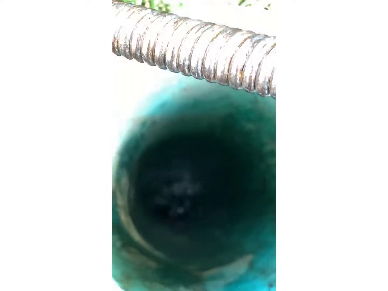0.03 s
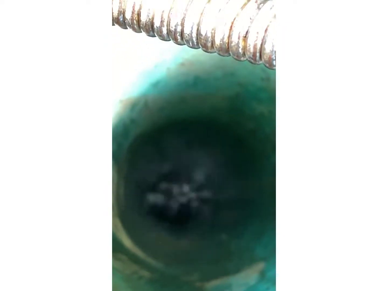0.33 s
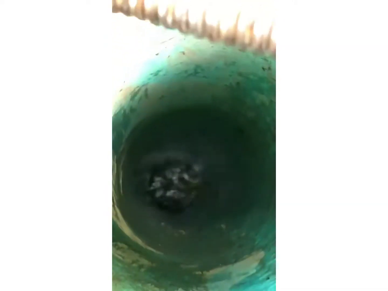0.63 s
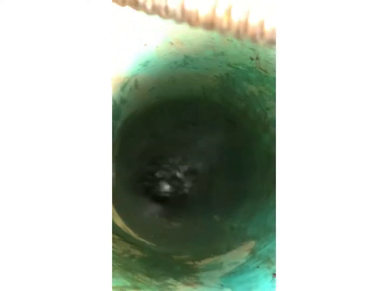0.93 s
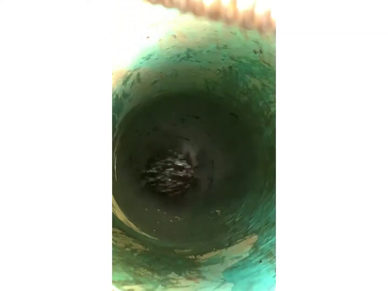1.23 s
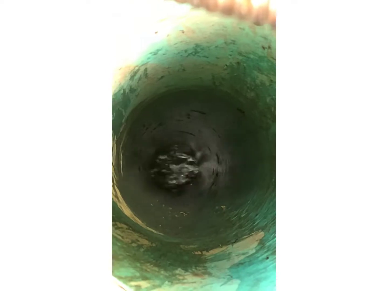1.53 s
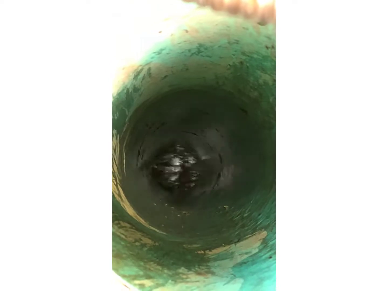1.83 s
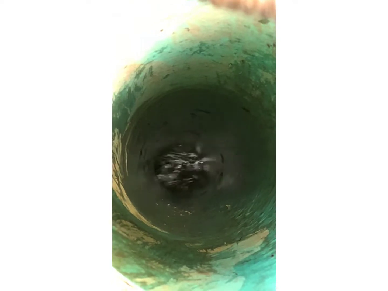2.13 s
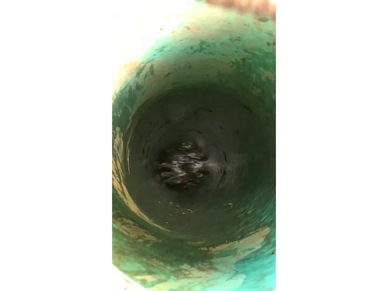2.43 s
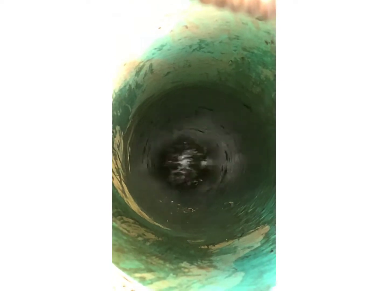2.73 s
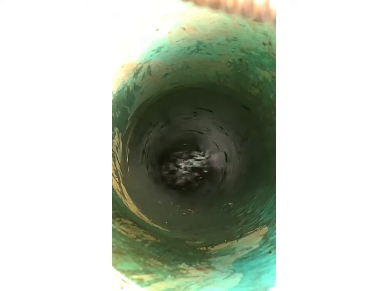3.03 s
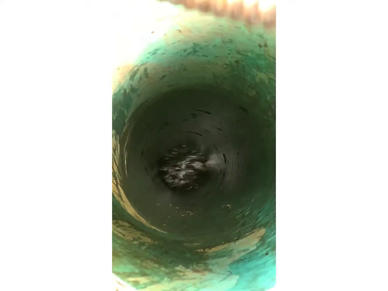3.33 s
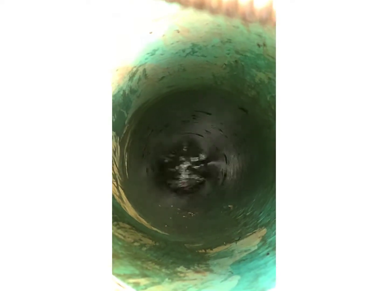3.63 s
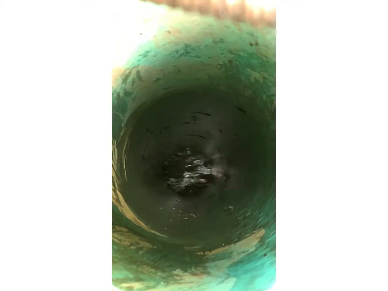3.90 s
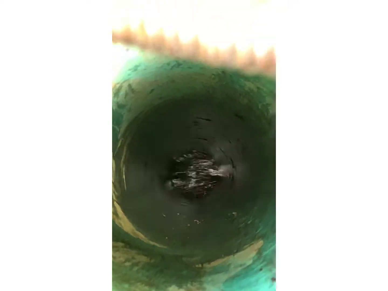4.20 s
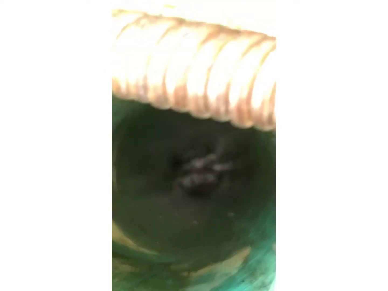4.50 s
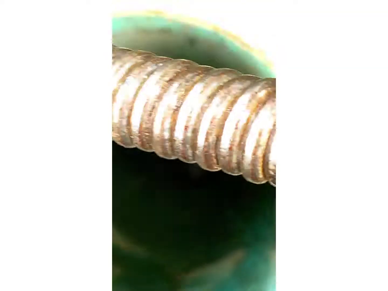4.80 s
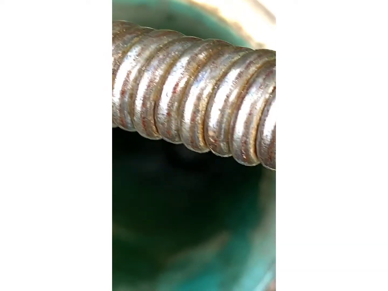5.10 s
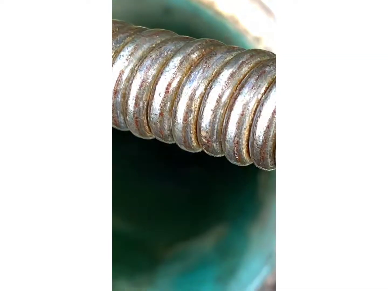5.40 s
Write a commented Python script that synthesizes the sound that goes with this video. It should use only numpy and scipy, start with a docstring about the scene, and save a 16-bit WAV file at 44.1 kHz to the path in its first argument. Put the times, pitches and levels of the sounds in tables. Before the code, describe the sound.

Heard from just above an open plastic sewer pipe, water gurgles and sprays down below with a low rumble and a hollow ring. At the start a metal cable chatters rapidly against the wall with clacks and thumps, then settles into scattered single knocks. Toward the end, bubbles plop more thickly and the uneven whirr of the cable machine outside fades up.

```python
"""Drain cable in a sewer pipe

Down an upright plastic pipe, a steel cable rattles against the wall for a second and a half, then
only bumps now and then; the air column rings with it. Water churns, gurgles and sprays at the
bottom throughout. Near the end it bubbles harder and the cable machine's whirr comes through."""
import sys
import numpy as np
from scipy import signal
from scipy.fft import rfft, irfft
from scipy.io import wavfile
from scipy.ndimage import map_coordinates

SR = 44100
rng = np.random.default_rng(int(sys.argv[2]) if len(sys.argv) > 2 else 0)


def waveform_to_disk(signal):
    """Save audio, clipped to [-1, 1], as 16-bit WAV at the path in sys.argv[1]."""
    frames = np.transpose(np.atleast_2d(signal))
    scaled = np.clip(frames, -1, 1) * 32767
    samples = np.round(scaled).astype(np.int16)
    wavfile.write(sys.argv[1], SR, samples)


N = 244755
TIME = np.arange(N) / SR
TAPS = 16384  # samples in a one-shot


# the rattle's ride: t/s, boom level/dB, boom f/Hz, clatter level/dB
RATTLE_RIDE = [(0.14, -44, 190, -35.5), (0.28, -25.5, 196, -33.5), (0.41, -30, 154, -39.5),
               (0.5, -34, 163, -34.5), (0.56, -30, 193, -38), (0.68, -26, 191, -34.5),
               (0.73, -29, 182, -57), (0.82, -26.5, 181, -47), (0.92, -34, 152, -35), (1.0, -32, 147, -39),
               (1.14, -29, 144, -50), (1.3, -25, 143, -59), (1.39, -27.5, 202, -55), (1.48, -28, 182, -49),
               (1.56, -34.5, 139, -50)]
# dark EQ of the boom: f/Hz, level/dB
BOOM_EQ = [(50, -34), (100, -1.5), (180, 5), (260, -6.5), (340, 2), (550, -37.5), (900, -64), (4000, -100)]
# hard, peaky EQ of the clatter: f/Hz, level/dB
CLATTER_EQ = [(150, 9), (330, 17), (550, -19), (850, 20), (1200, -4), (1700, -33), (2200, -10), (3000, -34),
              (5000, -6), (12000, -81)]
def rattle(pipe):
    """The cable's coils chatter on the wall: contacts boom and scrape, hard ones ring hollow."""
    boom_gain, _, clatter_gain = levels(RATTLE_RIDE)
    contacts, pushes = coil_knocks()
    grit = evened(impacts(per_s=150, spread_db=3.5))
    scrape = contacts + amp(-5) * grit + amp(-18) * rng.standard_normal(N)
    hard = sum(through(impacts(per_s=14, spread_db=1.5), hollow_ring(bright_db=-1, scatter_db=3))
               for spot in range(4))
    boom = amp(-6.5) * evened(through(pushes, pipe))
    boom += amp(-12) * evened(through(scrape, colour(BOOM_EQ), pipe))
    clatter = amp(-7) * evened(through(scrape, colour(CLATTER_EQ), pipe)) + amp(-9) * evened(hard)
    return (boom * boom_gain + clatter * clatter_gain) * rattle_envelope()


def coil_knocks(per_s=46, uneven=0.15, spread_db=2.2):
    """Coils hit the wall one after another: sharp contacts, and soft pushes at the boom's pitch."""
    contacts, pushes = np.zeros(N), np.zeros(N)
    times, _, boom_hz, _ = np.transpose(RATTLE_RIDE)
    coils_passed = np.cumsum(per_s * (1 + uneven * drift(per_s=40))) / SR
    strength = amp(spread_db * drift(per_s=50))
    for at in np.flatnonzero(np.diff(np.floor(coils_passed)) > 0):
        contacts[at] = strength[at]
        hz = np.interp(at / SR, times, boom_hz)
        add(pushes, at / SR, strength[at] * air_push(hz, decay_s=0.0052))
    return evened(contacts), evened(pushes)


def rattle_envelope(start_s=0.129, end_s=1.59, attack_s=0.006, release_db_per_s=100):
    """The rattle snaps in, holds, then dies away."""
    attack = np.clip((TIME - start_s) / attack_s, 0, 1)
    return attack * amp(-release_db_per_s * np.maximum(TIME - end_s, 0))


# single cable hits: t/s, clack level/dB, clack tilt/(dB per octave), thump level/dB, thump f/Hz
CABLE_HITS = [(0.139, -26, -4, -28.5, 202), (0.188, -21.5, -4, -41, 198), (0.243, -22, -7, -22.5, 226),
              (0.278, -33, 2, -23, 193), (0.296, -26.5, 4.5, -31, 208), (0.361, -27, -8, -20.5, 161),
              (0.411, -42, -11, -42, 192), (0.436, -34, -6, -40, 148), (0.479, -30, -4, -37, 190),
              (0.541, -28.5, 5.5, -41, 174), (0.569, -52, -2, -27.5, 200), (0.587, -43, -7, -33, 186),
              (0.616, -48, 0, -15.5, 166), (0.73, -29.5, -4.5, -28, 167), (0.792, -26, -6.5, -41, 191),
              (0.884, -30.5, -14, -44, 183), (0.901, -31.5, 2, -21.5, 150), (0.968, -33, 6, -37, 153),
              (1, -31, -4, -36, 157), (1.216, -31, -4, -42, 147), (1.261, -31.5, 3.5, -27, 147),
              (1.315, -38, -9.5, -23, 136), (1.343, -23.5, -1, -16, 184.6), (1.429, -26.5, -9, -24, 186.4),
              (1.51, -37, -8, -35, 169), (1.528, -29.5, 2.5, -29, 145), (1.596, -51, -16, -26.5, 117),
              (1.695, -41, -15, -29, 124), (1.961, -56, 3, -30, 121), (2.452, -34, -10, -33, 145),
              (2.683, -23.5, 0, -29, 172), (2.78, -25.5, -1.5, -36, 153), (2.918, -35.5, -6, -32, 126),
              (3.015, -27.5, -3.5, -30.5, 86), (3.134, -35.5, -18, -35, 94), (3.422, -34.5, -3, -30, 141),
              (3.946, -39.5, -16, -42, 110), (4.173, -34, -4, -38, 172), (4.428, -29, 2, -32, 111),
              (4.565, -45, -21, -28, 126), (4.716, -33, 9, -42, 107), (4.861, -31, -7.5, -24, 132),
              (5.129, -27, -4.5, -28, 130), (5.421, -42, -9, -21.5, 139)]
# EQ of steel scuffing plastic: f/Hz, level/dB
SCUFF_EQ = [(150, -13), (350, 8), (550, 4), (850, 2.5), (1150, -6.5), (1700, -3.5), (2200, -16.5),
            (3000, -6), (4500, -34), (12000, -47)]
def cable_hits(pipe):
    """The cable strikes: a hollow clack with a scuff of steel, and a soft thump down the pipe."""
    out, steel = np.zeros(N), colour(SCUFF_EQ)
    for s, clack_db, bright_db, thump_db, thump_hz in CABLE_HITS:
        scuff = through(noise_burst(decay_s=0.02), steel, pipe)
        ring = hollow_ring(bright_db, scatter_db=2.5)
        thump = through(air_push(thump_hz, decay_s=0.0073), pipe)
        add(out, s, amp(clack_db) * peaked(evened(ring) + amp(-7) * evened(scuff)))
        add(out, s, amp(thump_db - 1) * peaked(thump))
    return out


def air_push(hz, decay_s):
    """A soft, dying swing of air that takes a moment to build."""
    t = np.arange(TAPS // 4) / SR
    return np.sin(2 * np.pi * hz * t) * np.exp(-t / decay_s) * (1 - np.exp(-t * hz))


# hollow resonances of the pipe near its mouth: f/Hz, level/dB, t60/s
MOUTH_MODES = [(365, -14.5, 0.059), (393.7, -8, 0.15), (444.2, -9.5, 0.38), (481.8, -7, 0.43),
               (692, 1.5, 0.098), (827, 4, 0.1), (1035, 6.5, 0.091), (1283, 8.5, 0.07), (1488, -1.5, 0.12),
               (1705, 4, 0.083), (1890, -20, 0.036), (2092, -7, 0.15), (2385, -8, 0.13), (2534, -8, 0.054),
               (2847, -8, 0.069)]
def hollow_ring(bright_db, scatter_db):
    """The pipe rings hollow near its mouth, tilted by bright_db an octave, a new balance each time."""
    hz, db, t60 = np.transpose(MOUTH_MODES)[:, :, None]
    t = np.arange(TAPS) / SR
    db = db + bright_db * np.log2(hz / hz.mean()) + scatter_db * rng.standard_normal(hz.shape)
    modes = amp(db - 60 * t / t60) * np.sin(2 * np.pi * hz * t)
    return modes.T @ rng.choice([-1, 1], len(hz))


# modes of the air column: f/Hz, least width/Hz, level/dB
AIR_MODES = [(108.8, 11, -1), (135.4, 38, -6.5), (155.1, 5.56, 8), (201.9, 5.6, 7.5), (239.4, 17, -1),
             (287, 6.4, 3), (329, 8.5, 1), (385.8, 13, 6), (441.3, 9, 7.5), (490, 11.5, 9), (530, 11, -1),
             (568, 13, 1), (631, 9, 6.5), (691.4, 21.5, 6.5), (777.6, 21, 7), (826, 19, 4),
             (864.4, 22.6, 2.5), (954, 35, 1), (1020, 46, 7), (1189, 24.6, 19), (1310, 28, 4),
             (1362, 34.5, 10.5), (1440, 33, 1.5), (1522, 15, 7.5), (1590, 27, -7.5), (1670, 16.7, 11),
             (1834, 36, 5), (1985, 41, 0), (2000, 16.7, -6)]
def air_column(direct_db=-9):
    """The pipe's impulse response: the direct path plus the ring of its air."""
    hz, width, db = np.transpose(AIR_MODES)[:, :, None]
    # the open mouth lets high notes escape, so none of them rings for long
    width = np.maximum(width, hz / 34)
    detune = np.fft.rfftfreq(TAPS, 1 / SR) - hz
    modes = (amp(db) / (1 + 2j * detune / width)).sum(axis=0)
    return irfft(amp(direct_db) + modes)[:TAPS * 3 // 4]


# bubbles bursting out of the churn: t/s, level/dB, f/Hz, decay/cycles
PLOP_CUES = [(0.094, -40, 1630, 6), (0.105, -28.5, 1640, 3.8), (0.215, -37, 1570, 6.2),
             (0.2274, -28, 1610, 11), (0.277, -25, 880, 5.7), (0.295, -33, 1620, 9.8),
             (0.36, -31, 1627, 11), (0.4115, -35, 1610, 8.3), (0.54, -31, 1710, 1.4),
             (0.628, -30, 1646, 5.1), (0.922, -39, 1640, 15), (1.093, -42, 1730, 6.2),
             (1.179, -47, 1630, 6.9), (1.226, -47, 1680, 7), (1.429, -41, 1550, 21), (1.551, -41, 1630, 8),
             (1.734, -42.5, 1720, 12), (1.3436, -44, 1670, 1.9), (1.984, -32.5, 1378, 3.2),
             (2.207, -43, 1470, 93), (2.454, -29.5, 1628, 23), (2.7513, -34.5, 1554, 11),
             (3.016, -23.5, 1334, 4.8), (3.013, -29, 1600, 9.1), (3.015, -40, 449.4, 74),
             (2.906, -37, 1294, 35), (3.1772, -33.5, 1227, 19), (3.202, -41, 880, 11),
             (3.5803, -38, 1674, 8.7), (3.993, -42.5, 1590, 12), (4.2105, -30, 880, 4.5),
             (4.35, -43, 1724, 22), (4.429, -29, 1040, 7.5), (4.627, -27, 1004, 13),
             (4.712, -31.5, 858, 14), (4.776, -36, 1005, 18), (4.863, -19, 1038, 13),
             (4.863, -30, 1310, 14), (4.861, -36, 398, 19), (4.905, -30.5, 830, 8.2), (4.906, -42, 373, 15),
             (4.999, -32.5, 1337, 13), (5.11, -58, 2380, 18), (5.209, -39, 1706, 12),
             (5.21, -32.5, 810, 37), (5.262, -46, 2310, 32), (5.3, -31, 910, 28), (5.434, -31.5, 1010, 13)]
# wet EQ of the water: f/Hz, level/dB
WATER_EQ = [(100, 8), (160, 5.5), (280, 6), (440, -5), (700, -2.5), (1000, -9.5), (1600, -8), (2000, -19),
            (2500, -12), (3200, -13), (5000, -22.5), (12000, -61)]
def plops(pipe):
    """Single bubbles: the film bursts with a brief splash, and the bubble rings in the pipe."""
    out, wet = np.zeros(N), colour(WATER_EQ)
    for s, db, hz, cycles in PLOP_CUES:
        plop = amp(-11) * peaked(through(noise_burst(decay_s=0.0015, samples=TAPS // 2), wet))
        add(plop, 0, bubble(hz, cycles, rise=0.00074))
        add(out, s, amp(db - 1) * peaked(through(plop, pipe)))
    return out


# throaty gulps: t/s, level/dB, f/Hz
GULP_CUES = [(0.142, -24, 333), (0.275, -28.5, 297), (0.812, -31, 367), (1.431, -36, 490),
             (1.528, -28.5, 317), (2.685, -37.5, 436), (2.738, -35, 510), (3.015, -26.5, 447),
             (5.131, -41.5, 476)]
def gulps(pipe):
    """A pocket of air collapses: a rough burst around one pitch that sets the pipe ringing."""
    out = np.zeros(N)
    for s, db, hz in GULP_CUES:
        throat = colour([(hz / 4, -40), (hz / 1.4, -15), (hz, 0), (hz * 1.4, -15), (hz * 5, -45)])
        add(out, s, amp(db) * peaked(through(noise_burst(decay_s=0.024), throat, pipe)))
    return out


# the deep rumble's ride: t/s, level/dB
RUMBLE_RIDE = [(0.0, -46.5), (0.4, -67), (0.75, -39), (1.3, -42.5), (1.6, -52), (1.95, -39.5), (2.2, -46),
               (2.45, -43.5), (2.63, -46), (2.85, -47), (3.0, -46.5), (3.3, -47.5), (3.85, -45.5),
               (4.07, -51), (4.4, -47.5), (5.55, -45)]
# its bass-heavy EQ: f/Hz, level/dB
RUMBLE_EQ = [(15, -6.5), (35, -10), (60, -3), (100, -8.5), (160, -14.5), (250, -19.5), (500, -49),
             (3000, -101)]
def water(pipe):
    """Water churns at the bottom of the pipe: a lumpy rumble, and bubbles over a surging splatter."""
    lumps = rng.standard_normal(N) * amp(5 * np.tanh(drift(per_s=11)))
    rumble = amp(2) * levels(RUMBLE_RIDE)[0] * evened(through(lumps, colour(RUMBLE_EQ), pipe))
    splatter = evened(impacts(per_s=400, spread_db=2)) + amp(-3) * rng.standard_normal(N)
    churn = bubble_swarm(300, 4500, cycles=7, per_s=800, spread_db=2.8)
    churn += splatter * amp(2.7 * drift(per_s=14))
    gurgle = evened(through(churn, colour(WATER_EQ), pipe))
    return rumble + gurgle * churn_gain(level_db=-48.5, follows=0.25, stirred_db=4.5)


# how hard the water churns: t/s, level/dB
CHURN_RIDE = [(0.0, -58), (0.08, -64.5), (0.15, -50.5), (0.45, -57.5), (0.82, -53), (1.2, -56),
              (1.27, -49.5), (1.65, -59), (2.02, -51.5), (2.17, -68.5), (2.25, -48), (2.62, -58.5),
              (2.7, -53.5), (3.08, -52.5), (4.42, -51), (4.58, -53), (4.8, -46), (5.55, -48)]
def churn_gain(level_db, follows, stirred_db, usual_db=-50, lag_s=0.06):
    """A water layer's fader: it follows the churn and lifts while the rattling cable stirs it."""
    churn_db = np.interp(TIME, *np.transpose(CHURN_RIDE)) - usual_db
    pole = np.exp(-1 / (lag_s * SR))
    stirred = signal.lfilter([1 - pole], [1, -pole], rattle_envelope())
    return amp(level_db + follows * churn_db + stirred_db * stirred)


# the bubbling swells towards the end: t/s, level/dB
BUBBLING_RIDE = [(0, -75), (4.1, -55.5), (4.45, -64), (4.85, -51), (5.3, -71), (5.55, -64)]
def bubbling(pipe):
    """A thick run of mid-sized bubbles that ring up the pipe."""
    swarm = bubble_swarm(680, 1500, cycles=14, per_s=150, spread_db=2.4)
    return levels(BUBBLING_RIDE)[0] * evened(amp(3) * swarm + evened(through(swarm, pipe)))


def bubble_swarm(low_hz, high_hz, cycles, per_s, spread_db, sizes=90):
    """Bubbles of all sizes at random times, with even power per Hz."""
    out = np.zeros(N)
    draws = rng.random((sizes * 100, 3))[:int(per_s * N / SR)]
    shapes = [bubble(hz, cycles, rise=0.0026) * hz for hz in np.geomspace(low_hz, high_hz, sizes)]
    for when, kind, rarity in draws:
        strength = amp(-spread_db * np.log(max(rarity, .02)))
        add(out, when * N / SR, shapes[int(kind * sizes)] * strength)
    return evened(out)


def bubble(hz, cycles, rise):
    """A dying tone whose pitch climbs as the bubble nears the surface."""
    age = np.arange(int(5 * cycles * SR / hz)) * hz / SR / cycles  # in decay times
    tone = np.sin(2 * np.pi * cycles * (age + rise * age ** 2 / 2))
    return tone * np.exp(-age) * (1 - np.exp(-2 * cycles * age))


# spits of spray: t/s, level/dB, brightest f/Hz
SPIT_CUES = [(0.1364, -41, 7800), (0.227, -41.5, 7660), (0.69, -44, 8700), (0.813, -43, 6950),
             (1.343, -40.5, 7400), (1.435, -36, 6300), (1.82, -48, 6460), (1.926, -43.5, 6700),
             (1.994, -42.5, 7850), (2.059, -43.5, 9000), (2.245, -45, 3600), (2.29, -48, 9150),
             (2.724, -43, 5330), (2.75, -45.5, 6600), (2.869, -38, 5570), (2.899, -42.5, 5300),
             (3.169, -53, 6500), (3.459, -41, 3840), (3.594, -33.5, 4200), (3.715, -45, 9900),
             (3.739, -41, 5600), (3.96, -78.5, 8000), (4.166, -50, 9600), (4.24, -35, 3430),
             (4.344, -28.5, 4160), (4.42, -45, 4000), (4.489, -38.5, 5450), (4.714, -34.5, 7740),
             (4.963, -40.5, 8500)]
def spits():
    """Short spits of spray reach up the pipe, each bright at the pitch of its droplets."""
    out = np.zeros(N)
    for s, db, hz in SPIT_CUES:
        wet = colour([(hz / 6, -30), (hz / 1.45, -13), (hz, 0), (hz * 1.38, -13), (hz * 4, -30)])
        add(out, s, amp(db - 1) * peaked(through(echoes(decay_s=0.014), wet)))
    return out


# bright EQ of the spray: f/Hz, level/dB
SPRAY_EQ = [(1200, -15), (2400, 9), (3300, 7), (4200, 3.5), (5500, 1.5), (6500, 1.5), (7800, 0.5),
            (9500, -1), (12000, -3), (15500, -6.5)]
def spray():
    """Splashing droplets and tiny bubbles, smeared by the walls, over a fine fizz."""
    edges_hz = np.geomspace(1800, 16000, 9)
    splashes = evened(sum(droplets(low, high) for low, high in zip(edges_hz, edges_hz[1:])))
    tinkle = amp(-5) * bubble_swarm(2400, 13000, cycles=9, per_s=600, spread_db=3.2)
    direct = (splashes + tinkle) * amp(2.3 * drift(per_s=12))
    smear = amp(-4) * through(direct, echoes(decay_s=.008))
    fizz = amp(-10) * rng.standard_normal(N)
    mist = evened(through(direct + smear + fizz, colour(SPRAY_EQ)))
    return mist * churn_gain(level_db=-55, follows=0.71, stirred_db=1.5)


def droplets(low_hz, high_hz):
    """Droplets of one size: dense, and landing in their own clumps."""
    drops = evened(impacts(per_s=1200, spread_db=3)) * amp(8.5 * np.tanh(drift(per_s=40)))
    return signal.sosfilt(signal.butter(2, [low_hz, high_hz], "band", fs=SR, output="sos"), drops)


# the cable machine outside fades up late: t/s, level/dB
MACHINE_RIDE = [(0, -71), (4.0, -58), (4.4, -47), (4.8, -44.5), (5.25, -40), (5.55, -46)]
# EQ of its whirr: f/Hz, level/dB
WHIRR_EQ = [(80, 1), (140, 15.5), (250, -8), (400, -16), (550, -3), (850, 6), (1100, 5), (1700, -12.5),
            (2100, -24), (3000, -22), (5000, -19), (14000, -53)]
def machine():
    """The machine's uneven whirr, with a hollow ring from the pipe's mouth."""
    whirr = rng.standard_normal(N) * amp(2.8 * drift(per_s=40))
    hollow = evened(through(whirr, hollow_ring(bright_db=-2.5, scatter_db=-1)))
    direct = evened(through(whirr, colour(WHIRR_EQ)))
    return levels(MACHINE_RIDE)[0] * amp(-7.5) * (direct + amp(-1) * hollow)


def click(at_s=4.6022, peak_db=-30):
    """One dry click, very close."""
    out = np.zeros(N)
    body = colour([(900, -8), (2000, 6), (3200, 8), (4300, 3),
                   (6000, -9), (8300, 0), (11000, -3), (15000, -4)])
    snap = signal.unit_impulse(TAPS // 4) + amp(-2) * echoes(decay_s=.0008)
    add(out, at_s, amp(peak_db) * peaked(through(snap, body)))
    return out


# EQ of the noise bed: f/Hz, level/dB
HISS_EQ = [(1000, 12), (4500, -31), (5600, -11), (6500, 0), (7700, 10.5), (8200, 14), (8700, 1.5),
           (9700, -24), (10500, -28), (15000, -64)]
def hiss():
    """A thin, steady hiss under everything."""
    return amp(-61.5) * evened(through(rng.standard_normal(N), colour(HISS_EQ)))


# EQ of the rim's reflections: f/Hz, level/dB
RIM_EQ = [(100, -23), (900, -19), (2200, -7), (4500, -6), (8000, -11), (13000, -11)]
def rim(stems):
    """One side's reflections off the pipe's rim: each stem has its own paths, mostly in the treble."""
    return through(sum(through(stem, echoes(decay_s=.005)) for stem in stems), colour(RIM_EQ))


# stereo phase offset at full width: f/Hz, left lead/rad
LEFT_LEAD = [(20, 0), (130, -.25), (300, -.4), (550, -1), (1030, -2.5), (1460, -4.7), (1750, -5.4),
             (2700, -4.7), (3300, -4), (4900, -3.2), (6300, -1.3), (7670, 0), (8870, 0), (11500, 2.9),
             (12900, 3.3), (14800, 6.2)]
def stereo(x, width):
    """Turns left and right apart in phase; width stands for the direction of the source."""
    size = 16 * TAPS
    turn = np.exp(.5j * width * at_hz(LEFT_LEAD, np.fft.rfftfreq(size, 1 / SR)))
    return irfft(rfft(x, size) * np.array([turn, turn.conj()]))[:, :N]


def echoes(decay_s):
    """Dense reflections between the walls, energy 1."""
    tail = noise_burst(decay_s, samples=TAPS // 4)
    return tail / np.linalg.norm(tail)


def noise_burst(decay_s, samples=TAPS):
    """White noise with an instant attack and a dying tail."""
    t = np.arange(samples) / SR
    return rng.standard_normal(samples) * np.exp(-t / decay_s)


def impacts(per_s, spread_db):
    """Clicks at random times: many small, a few large."""
    out = np.zeros(N)
    when, size, side = rng.random((N // 10, 3))[:int(per_s * N / SR)].T
    db = spread_db * np.minimum(-np.log(1 - size), 3.5)
    out[(when * N).astype(int)] = np.sign(side - .5) * amp(db)
    return out


def drift(per_s):
    """A random modulator of rms 1."""
    knots = rng.standard_normal(N // 100)
    return evened(map_coordinates(knots, [TIME * per_s], order=1, mode="wrap"))


def colour(eq):
    """Minimum-phase impulse response of an EQ curve (f/Hz, level/dB)."""
    log_gain = np.log(amp(at_hz(eq, abs(np.fft.fftfreq(TAPS, 1 / SR)))))
    return np.fft.ifft(np.exp(np.conj(signal.hilbert(log_gain)))).real[:TAPS // 8]


def through(x, *responses):
    """Passes x through each impulse response in turn."""
    for response in responses:
        x = signal.oaconvolve(x, response)[:len(x)]
    return x


def at_hz(curve, hz):
    """Reads a curve on a log-frequency axis."""
    f, value = np.transpose(curve)
    return np.interp(np.log(hz + 1), np.log(f + 1), value)


def levels(ride):
    """One gain curve for each column after the time, read as dB."""
    s, *columns = np.transpose(ride)
    return [amp(np.interp(TIME, s, column)) for column in columns]


def add(mix, s, sound):
    """Mixes a sound in at time s."""
    part = mix[max(round(s * SR), 0):][:len(sound)]
    part += sound[:len(part)]


def amp(db):
    """Decibels to gain."""
    return 10 ** (np.asarray(db) / 20)


def evened(x):
    """Scales to rms 1."""
    return x / np.sqrt(np.mean(x ** 2) + 1e-20)


def peaked(x):
    """Scales to peak 1."""
    return x / (abs(x).max() + 1e-20)


def scene():
    """The pipe's sounds wide, the machine narrow, the click dead centre."""
    pipe = air_column()
    bed = hiss()
    stems = [rattle(pipe) + cable_hits(pipe),
             water(pipe) + bubbling(pipe) + spits(),
             plops(pipe) + gulps(pipe) + spray(),
             bed]
    reflected = np.array([rim(stems) for side in range(2)])
    return stereo(sum(stems), width=1) + reflected + stereo(machine(), width=0.16) + click()


def record(dry):
    """Master EQ: a subsonic cut at 18 Hz and a steep high cut at 15.8 kHz."""
    dry = signal.sosfilt(signal.butter(2, 18, "high", fs=SR, output="sos"), dry)
    high_cut = signal.firwin(511, 15800, window=("kaiser", 9), fs=SR)
    return signal.oaconvolve(dry, high_cut[None], "same")


dry = scene()
out = record(dry)
waveform_to_disk(out)
```